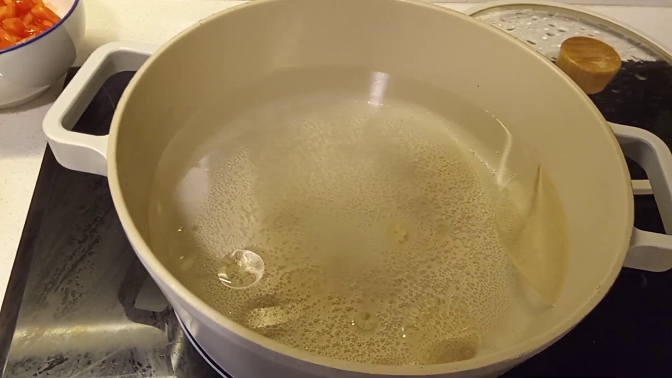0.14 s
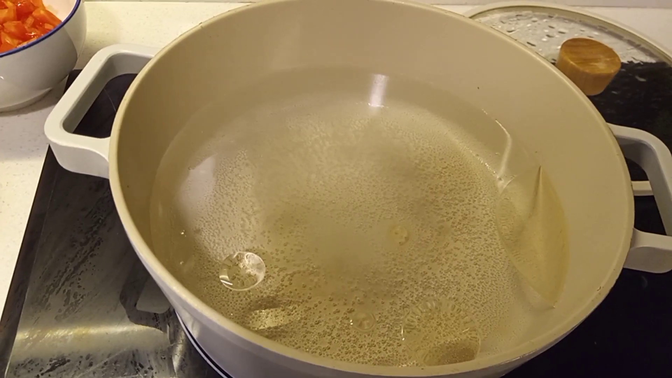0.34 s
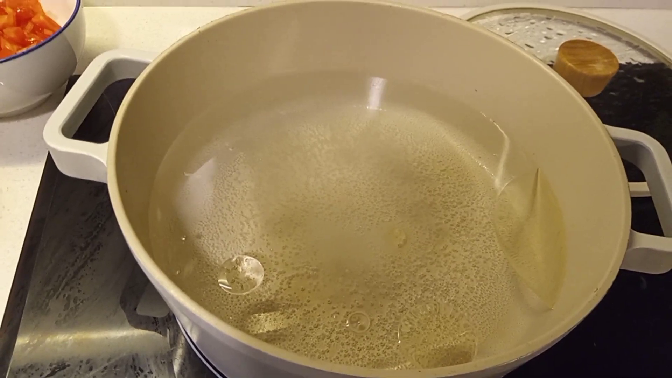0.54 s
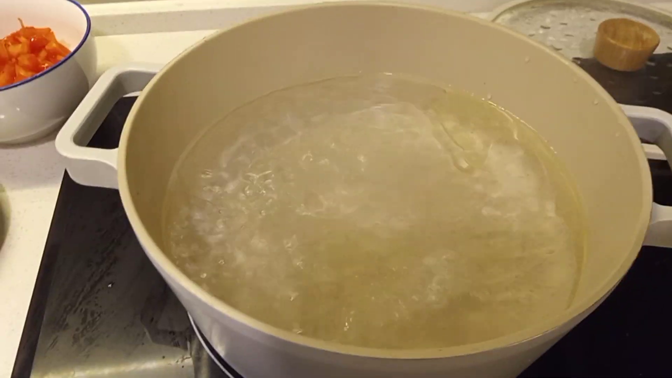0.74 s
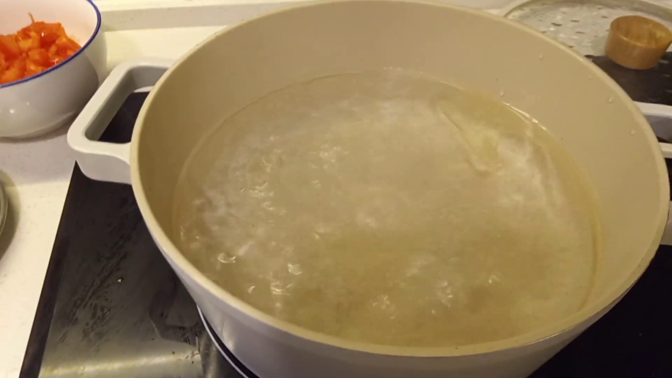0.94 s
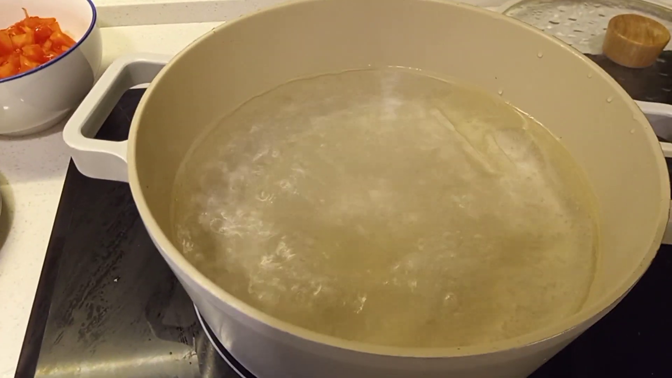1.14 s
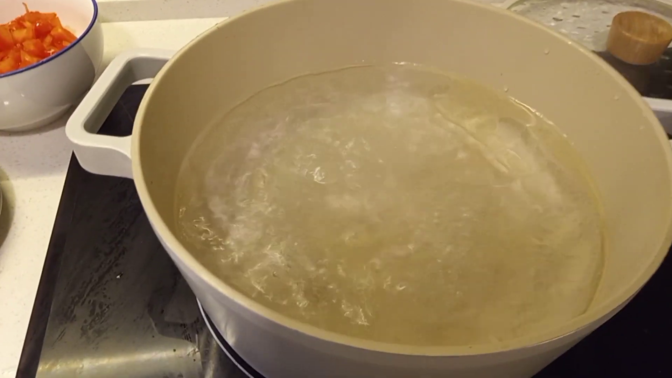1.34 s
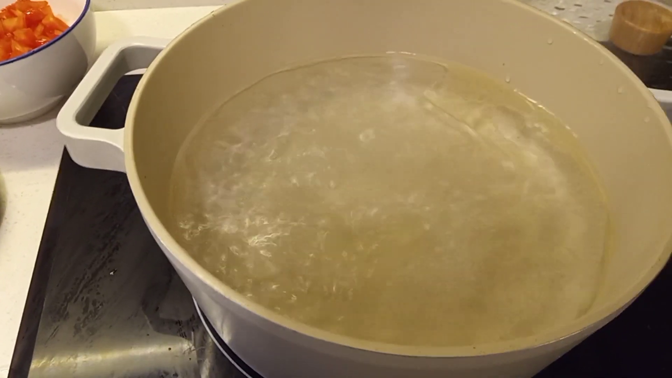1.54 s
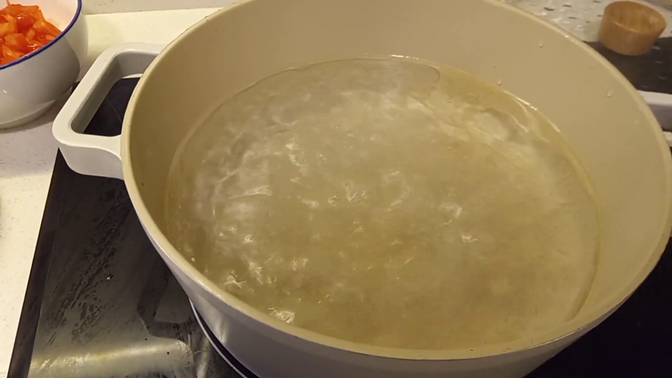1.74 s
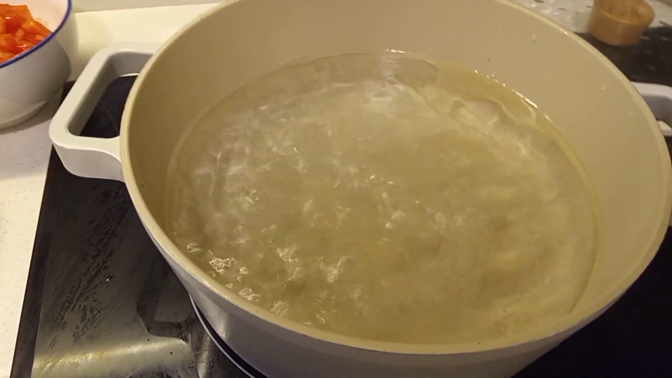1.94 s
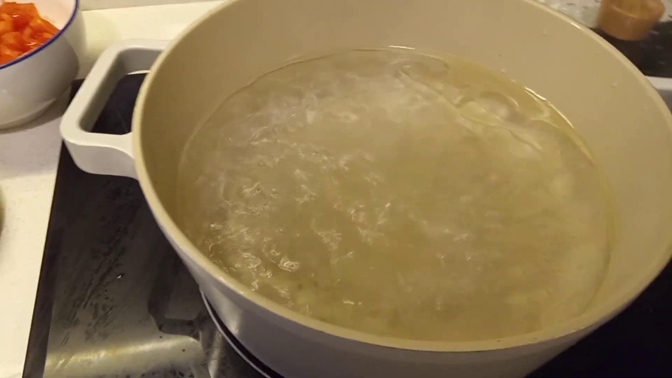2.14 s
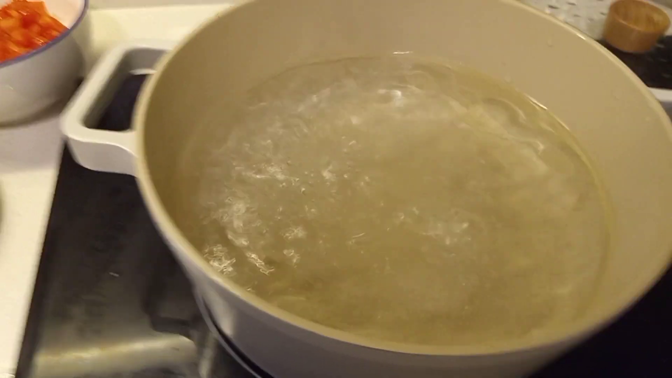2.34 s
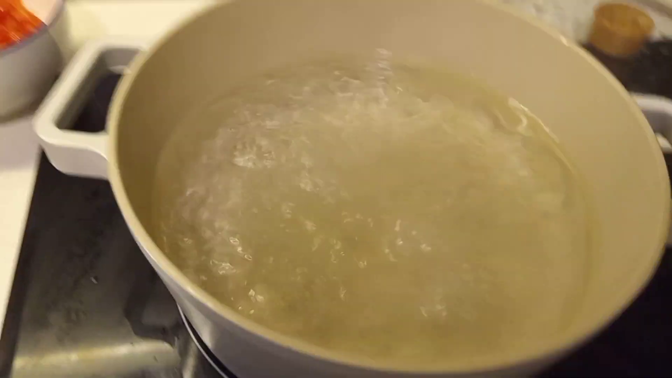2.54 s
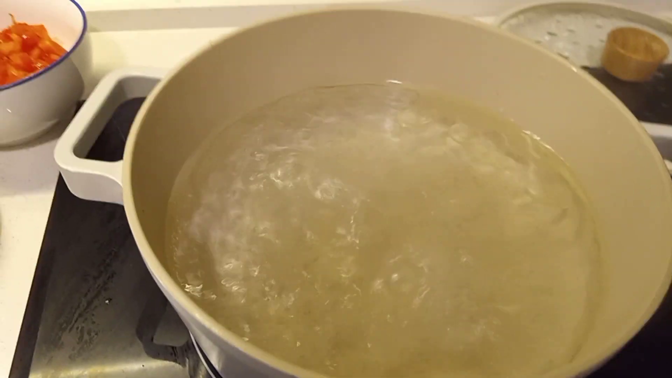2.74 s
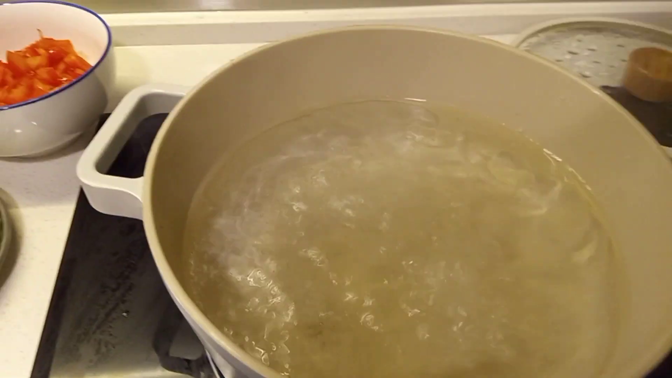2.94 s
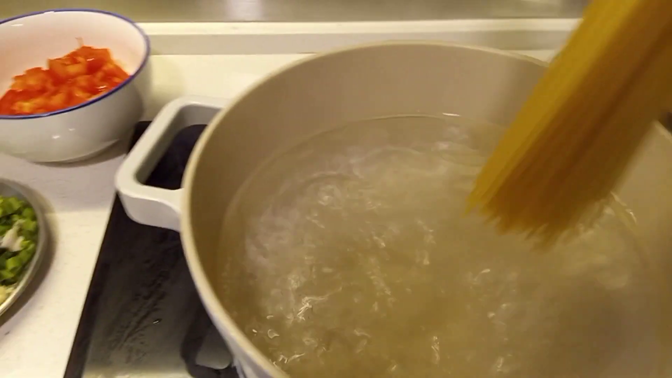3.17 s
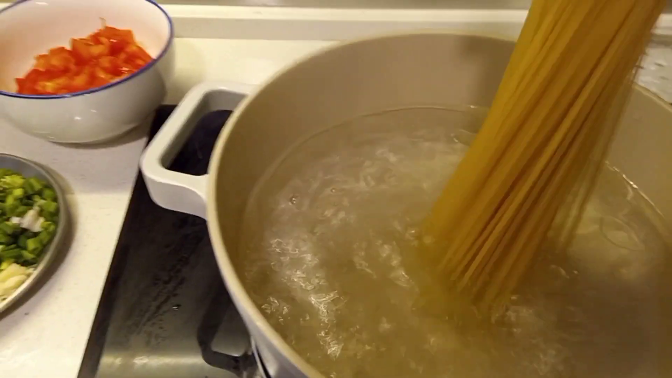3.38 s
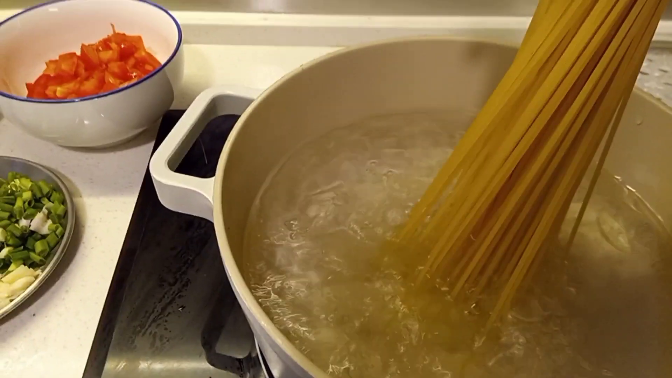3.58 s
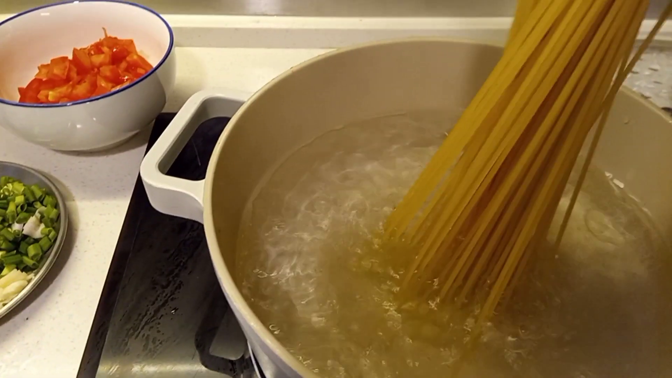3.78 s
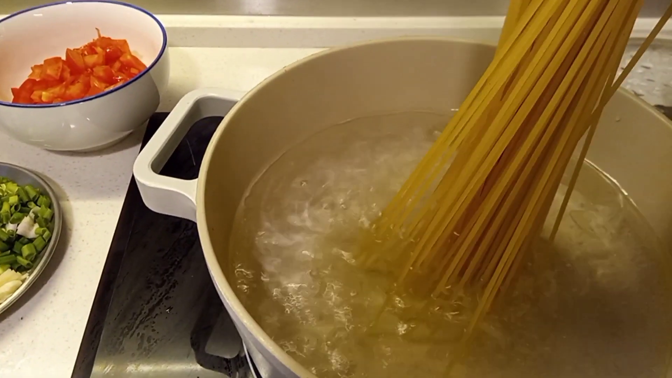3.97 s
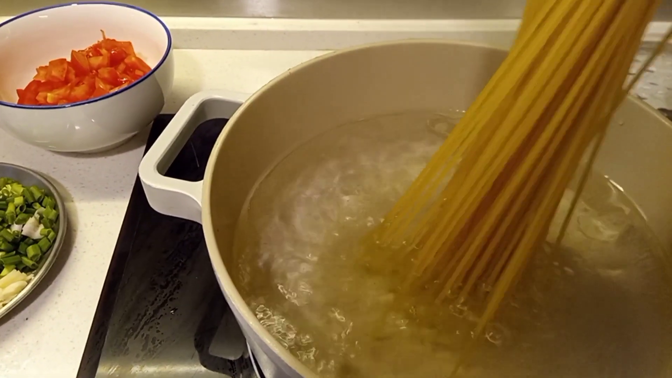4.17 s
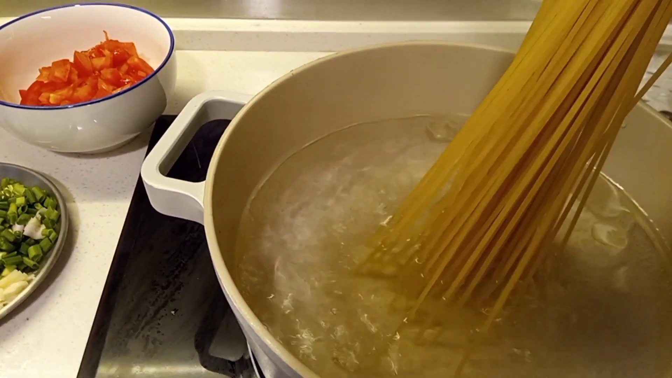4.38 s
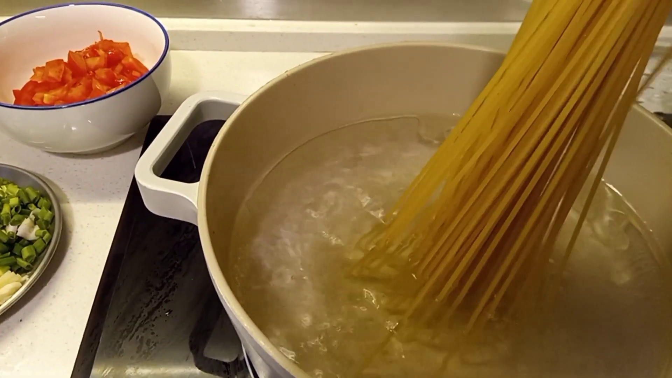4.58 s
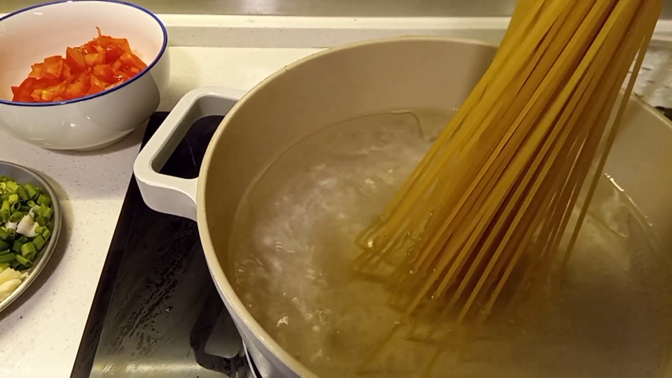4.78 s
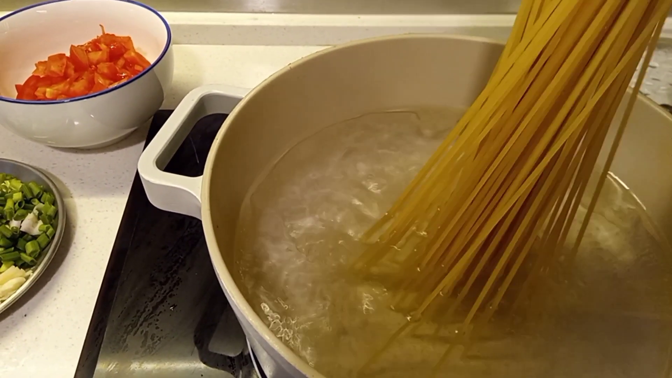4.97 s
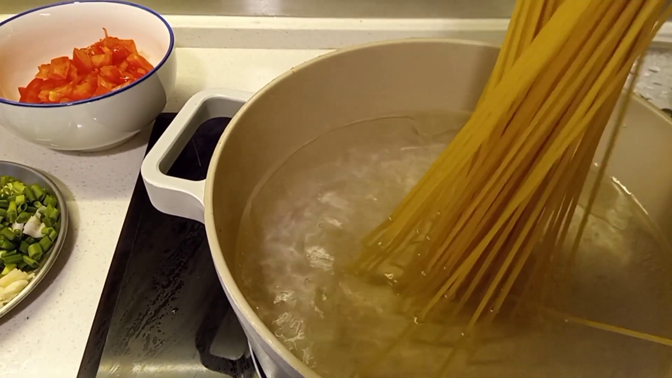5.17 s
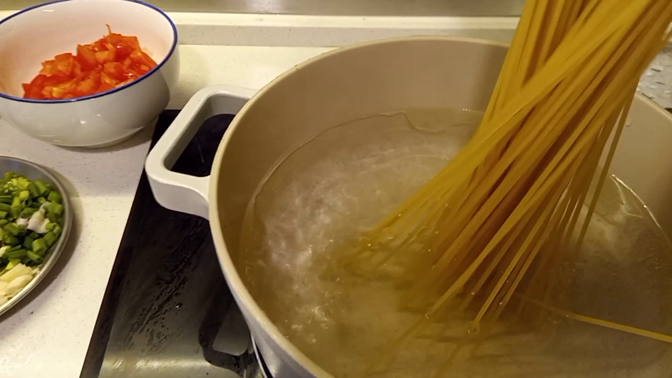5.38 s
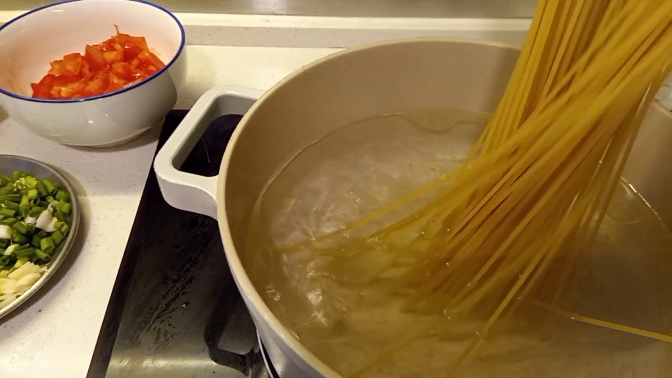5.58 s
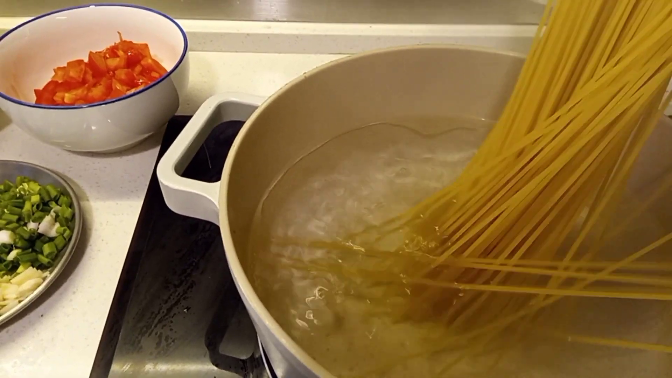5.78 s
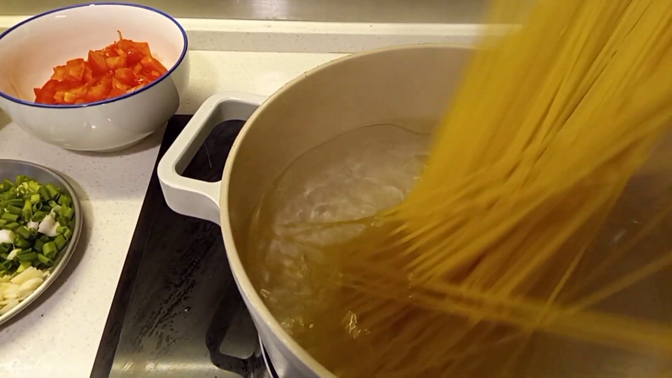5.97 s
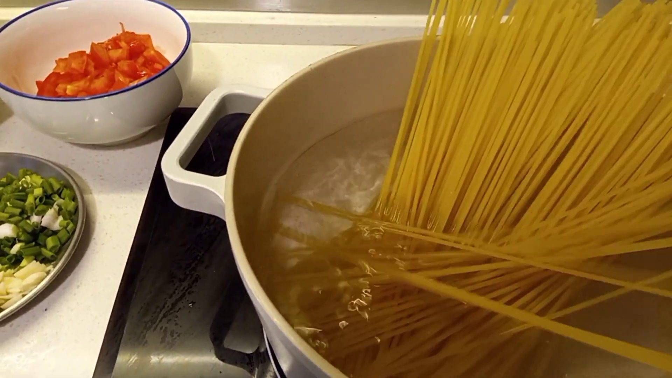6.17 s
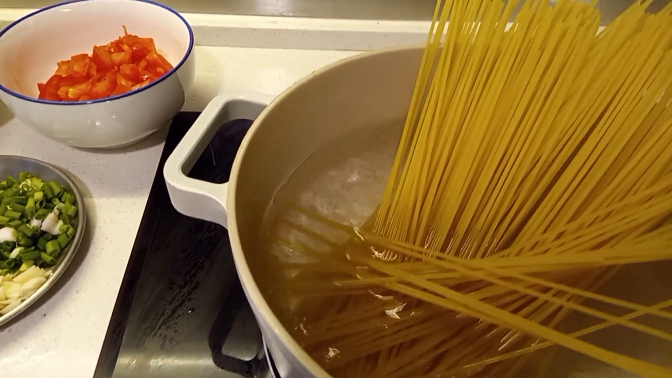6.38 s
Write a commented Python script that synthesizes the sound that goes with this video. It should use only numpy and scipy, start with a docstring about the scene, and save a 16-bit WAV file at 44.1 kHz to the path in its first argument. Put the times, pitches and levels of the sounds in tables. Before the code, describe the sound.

Low boiling burble with a brief early dropout, a rustle of dry pasta, a clattering landing in the pot, sparse brittle clicks and a final slide.

```python
"""A wide pot of water bubbles on a hob in a small kitchen; the sound drops out briefly near the start.
A bundle of dry spaghetti rustles as it is gathered up, then its tips land on the bottom of the pot.
Single strands click against each other and the rim, until the bundle is let go and fans out.
Spaghetti is bursts of filtered impacts, ringing modes and struck strands; the boil is filtered
impacts with water resonances and gliding bubble tones over a soft noise hiss."""
import sys
import numpy as np
from scipy import signal
from scipy.io import wavfile
from scipy.ndimage import uniform_filter1d

SR = 44100
rng = np.random.default_rng(int(sys.argv[2]) if len(sys.argv) > 2 else 0)


def persist_wave(psi):
    """Save psi, clipped to +-1, as 16-bit WAV."""
    counts = np.round(np.clip(psi, -1, 1) * 32767).astype(np.int16)
    wavfile.write(sys.argv[1], SR, np.atleast_2d(counts).T)


N = 282989
TIME = np.arange(N) / SR
EDGE_HZ = 15850  # upper band limit; almost nothing sounds above it

# waves of tips landing in the pot: start_s, rise_s, hold_s, relative ticks_db, relative body_db
TIP_LANDINGS = [(3.253, 0.035, 0.0076, -31.5, -34.5), (3.326, 0.03, 0.021, -40.5, -44.5),
                (3.435, 0.032, 0.029, -63, -67)]
# tone colour of the landing: frequency_hz, relative level_db
LANDING_SPECTRUM = [(130, -28), (210, -3), (320, -4.5), (410, -37), (490, -1.5), (600, -3), (680, -14),
                    (780, -4), (1150, 4), (2700, -7), (3900, -17), (5900, -3.5), (7400, -13.5),
                    (11000, -34), (14000, -38), (15500, -24)]
# modes of the held bundle: frequency_hz, relative level_db
BUNDLE_MODES = [(1416, -66), (1879, -69), (2584, -69.5), (2821, -74), (3144, -82), (3429, -79),
                (3774, -79.5), (4140, -72.5), (4953, -73), (5233, -77.5), (5943, -77), (6019, -75.5),
                (6137, -72), (6449, -79), (6675, -70), (6735, -80.5), (7596, -83.5), (8403, -95)]
# modes of the pot: frequency_hz, relative level_db
POT_MODES = [(595, -43), (918, -52.5), (1064, -52), (1260, -40), (1844, -43.5), (2035, -39), (2404, -40.5),
             (2632, -47.5), (2815, -48), (3531, -61), (4935, -53), (5115, -48), (5744, -44.5),
             (5848, -44.5), (6075, -42.5), (6971, -63)]


def amp(db):
    """Decibels to gain."""
    return 10 ** (np.asarray(db) / 20)


def unit(x):
    """Scales to an rms of one."""
    return x / np.sqrt(np.mean(x ** 2) + 1e-20)


def read(points, hz):
    """Reads a curve of (frequency_hz, value) on a log-frequency axis."""
    f, value = np.transpose(points)
    return np.interp(np.log(hz + 1), np.log(f), value)


def add(mix, s, sound):
    """Mixes a sound in at time s."""
    part = mix[max(round(s * SR), 0):][:len(sound)]
    part += sound[:len(part)]


def colour(x, spectrum, size=4096):
    """Causal minimum-phase filter with the given spectrum, so that attacks stay sharp."""
    hz = abs(np.fft.fftfreq(size, 1 / SR))
    log_gain = np.log(amp(np.maximum(read(spectrum, hz), -100)))
    # the Hilbert transform of the log gain supplies the phase
    response = np.fft.ifft(np.exp(np.conj(signal.hilbert(log_gain)))).real
    return signal.oaconvolve(x, response[:size // 2])[:len(x)]


def resonate(x, hz, width_hz):
    """One resonance, with a gain of one at its peak."""
    b, a = signal.iirpeak(min(hz, SR / 2 - 1), hz / abs(width_hz), SR)
    return signal.lfilter(b, a, x)


def patter(per_s, spread_db, size=N):
    """Random tiny impacts of either sign, most of them weak and a few strong."""
    strength_db = spread_db * np.minimum(rng.exponential(1, size), np.pi)
    force = amp(strength_db) * rng.choice([-1, 1], size)
    return force * (rng.random(size) < per_s / SR)


def surges(t, rows, fall_db_per_s):
    """Each push builds up, holds and dies away; rows are (start_s, rise_s, hold_s, level_db)."""
    power = np.zeros(len(t))
    for s, rise_s, hold_s, db in rows:
        attack = np.clip((t - s) / rise_s, 0, 1) ** 2
        release_db = fall_db_per_s * np.maximum(t - s - rise_s - hold_s, 0)
        power += (attack * amp(db - release_db)) ** 2
    return np.sqrt(power)


def spaghetti():
    """The whole bundle is gathered, stood in the pot and let go: three rattles of strand contacts."""
    # shoves that gather the bundle: start_s, rise_s, hold_s, relative ticks_db, relative body_db
    shoves = [(0.62, 0.046, 0.16, -50.5, -59.5), (0.86, 0.059, .005, -54.5, -61),
              (0.985, 0.028, 0.011, -45, -56.5), (1.02, 0.024, .012, -66, -62),
              (1.135, 0.026, 0.032, -53, -59), (1.31, 0.034, .003, -68.5, -77),
              (1.385, 0.06, 0.011, -59, -70), (1.53, 0.012, .002, -63, -79),
              (1.66, 0.057, 0.18, -73, -81.5), (1.94, 0.012, 0.0035, -67, -66),
              (1.98, 0.011, .003, -64, -91), (2.115, 0.023, .003, -68.5, -71)]
    # tone colour of the gathering: frequency_hz, relative level_db
    shove_spectrum = [(500, -51), (1000, -6), (1420, -20.5), (1650, -13.5), (1880, 2.5), (2300, -12.5),
                      (2700, -4), (4400, -9), (5500, -2), (6660, 2), (8700, -15), (11500, -19.5),
                      (13500, -28), (15300, -10.5)]
    # slides as it fans out along the rim: start_s, rise_s, hold_s, relative ticks_db, relative body_db
    slides = [(5.922, .017, 0.0033, -46, -74), (5.945, .02, 0.043, -54, -78),
              (6.0, 0.035, 0.0068, -46, -61.5), (6.14, 0.11, .012, -71, -92)]
    # tone colour of the slides: frequency_hz, relative level_db
    slide_spectrum = [(700, -47), (1200, -29), (2100, -10), (3200, -15), (4200, -3.5), (5500, -3),
                      (7000, 6), (8500, -15.5), (11000, -20), (13400, -21), (15000, -10)]
    out = np.zeros(N)
    add(out, *rattle(shoves, shove_spectrum, BUNDLE_MODES,
                     ticks_fall_db_per_s=282, body_fall_db_per_s=230, per_s=2500, spread_db=4.0,
                     direct_db=-4.5, twang_db=4.0, ring_db=-5.5, width_hz=21.5, knocks_per_s=130))
    add(out, *rattle(TIP_LANDINGS, LANDING_SPECTRUM, POT_MODES,
                     ticks_fall_db_per_s=516, body_fall_db_per_s=444, per_s=4000, spread_db=1.5,
                     direct_db=0.74, twang_db=-4, ring_db=-9, width_hz=20.5, knocks_per_s=460))
    add(out, *rattle(slides, slide_spectrum, POT_MODES,
                     ticks_fall_db_per_s=420, body_fall_db_per_s=410, per_s=1800, spread_db=3.0,
                     direct_db=-1, twang_db=16, ring_db=-10, width_hz=30, knocks_per_s=140))
    return out


def rattle(rows, spectrum, modes, ticks_fall_db_per_s, body_fall_db_per_s, per_s, spread_db, direct_db,
           twang_db, ring_db, width_hz, knocks_per_s, split_hz=3200):
    """Strand contacts as bright ticks over a hollow body; separate sparse knocks ring each mode."""
    s, rise_s, hold_s, ticks_db, body_db = np.transpose(rows)
    t = np.arange(s[0], s[-1] + .3, 1 / SR)
    bright = surges(t, zip(s, rise_s, hold_s, ticks_db), ticks_fall_db_per_s)
    hollow = surges(t, zip(s, rise_s, hold_s, body_db), body_fall_db_per_s)
    ticks = unit(patter(per_s, spread_db)[:len(t)])
    ringing_strands = amp(twang_db) * twangs(len(t), t60=0.081, spread_db=3)
    contacts = colour(ticks + ringing_strands, spectrum)
    high = signal.sosfilt(signal.butter(4, split_hz, "high", fs=SR, output="sos"), contacts)
    low = signal.sosfilt(signal.butter(4, split_hz, "low", fs=SR, output="sos"), contacts)
    sound = amp(direct_db) * (bright * unit(high) + hollow * unit(low))
    loudest_db = max(db for _, db in modes)
    for hz, db in modes:
        push = bright if hz > split_hz else hollow
        blows = unit(patter(knocks_per_s, spread_db, size=2 * SR))[:len(t)] * push
        # a narrow mode takes only its share of a blow's energy
        makeup = np.sqrt(SR / (np.pi * width_hz))
        sound += amp(db - loudest_db + ring_db) * makeup * resonate(blows, hz, width_hz)
    return s[0], sound


def twangs(size, t60, spread_db, count=5000):
    """Hits spread over two seconds, cut to size: each strand rings briefly at its own pitch."""
    out, age = np.zeros(size), np.arange(SR // 16) / SR
    decay = amp(-60 * age / t60)
    hits = rng.random((count, 3)) * [2, EDGE_HZ, 1]
    for s, hz, luck in hits[hits[:, 0] < size / SR]:
        strength = amp(-spread_db * np.log(max(luck, .1)))
        add(out, s, strength * decay * np.sin(2 * np.pi * hz * age))
    return unit(out)


def afterring(ring_db=-12):
    """Each wave of tips leaves the pot ringing."""
    out, t = np.zeros(N), np.arange(SR // 2) / SR
    for s, rise_s, hold_s, _, body_db in TIP_LANDINGS:
        fade_in = np.minimum(t / hold_s, 1)
        add(out, s + rise_s, amp(body_db + ring_db) * fade_in * pot_ring(t, LANDING_SPECTRUM))
    return out


def pot_ring(t, spectrum, t60_at_1khz=0.49, damping=0.74):
    """The modes of the pot dying away after a blow of the given colour, the high ones first."""
    hz, db = np.transpose(POT_MODES)
    phases = np.outer(hz, t) + rng.random((len(hz), 1))
    tones = amp(db + read(spectrum, hz))[:, None] * np.sin(2 * np.pi * phases)
    t60 = t60_at_1khz * (hz / 10 ** 3) ** -damping
    return (tones * amp(-60 * t / t60[:, None])).sum(0) / tones.sum(0).std()


def knocks(rise_s=0.0024, t60=0.1, reach_octaves=0.2):
    """Strands settling in the bundle ring those of its modes that lie near their own pitch."""
    # strands knocking as they settle: start_s, relative level_db, pitch_hz
    settling = [(0.825, -54, 1420), (1.154, -54.5, 3570), (1.171, -55, 4130), (1.409, -66, 1880),
                (1.429, -59, 6900), (1.545, -61, 6900), (1.548, -60.5, 4470), (1.95, -59.5, 4140),
                (1.952, -57, 1540), (1.99, -59.5, 3600)]
    out, t = np.zeros(N), np.arange(SR // 4) / SR
    hz, mode_db = np.transpose(BUNDLE_MODES)
    shape = (1 - np.exp(-t / rise_s)) * np.exp(-np.log(1000) * t / t60)
    for s, db, centre_hz in settling:
        weight = amp(mode_db) * np.exp(-(np.log2(hz / centre_hz) / reach_octaves) ** 2)
        tones = np.sin(2 * np.pi * (np.outer(hz, t) + rng.random((len(hz), 1))))
        add(out, s, amp(db) * shape / shape.max() * unit(weight @ tones))
    return out


def clicks(width_hz=200, crack_db=5, crack_s=0.0029, rise_s=0.00047, t60=0.094, partials_db=3,
           pot_db=-18, count=70):
    """One strand strikes: a treble snap, chatter, scattered partials, one clear ping; the pot rings on."""
    # strand strikes: start_s, relative level_db, pitch_hz, relative snap_db, ping_over_chatter_db
    strikes = [(0.7938, -49, 6800, -10, 2), (1.0085, -44.5, 6200, -15, 14), (1.179, -48, 5950, -29, 4),
               (1.826, -65.5, 6230, -5, 1), (2.7916, -66, 4270, -14, 1), (2.792, -76, 9270, -20, 13),
               (3.4681, -45, 6060, -32, 0), (3.492, -50.5, 5990, -37, -3), (3.688, -38, 5980, -20, -6),
               (3.691, -50, 2890, -33, 2), (3.733, -51.5, 4100, -25, 8), (3.7435, -60, 3620, -35, 6),
               (4.9578, -50, 6100, -10, 5), (4.9637, -68, 5900, -20, 13), (5.0357, -55, 6120, -16.5, 12),
               (5.107, -69.5, 7590, -23, 8), (5.138, -58.5, 3220, -30, 15), (5.5799, -60.5, 6600, -1.5, -1),
               (5.59, -62.5, 6140, -6, 4), (5.6408, -61.5, 5980, -5, 1), (5.695, -62.5, 3940, -8, 8),
               (5.7125, -66, 3950, -6, -1), (5.9312, -52, 7300, -29, 6), (5.9393, -45.5, 7170, -30, 13),
               (6.0, -51, 6060, -10, -1), (6.0323, -43.5, 7070, -8, -7), (6.0422, -52, 6730, -12, -4)]
    # colour of the chatter: frequency_hz, relative level_db
    chatter_spectrum = [(300, -30), (1500, -19.5), (2300, -19.5), (2900, -5), (3800, -3.5), (4300, -12),
                        (5300, 2.5), (6300, -1), (7400, -1), (8400, -33), (15500, -46)]
    # colour of the treble snap: frequency_hz, relative level_db
    snap_spectrum = [(4000, -9.5), (8000, 2), (10000, 4.5), (13000, -7), (15300, 4)]
    out, t = np.zeros(N), np.arange(SR // 5) / SR
    for s, db, hz, snap_db, ping_db in strikes:
        crack = 1 + amp(crack_db) * np.exp(-t / crack_s)
        shape = (1 - np.exp(-t / rise_s)) * np.exp(-np.log(1000) * t / t60) * crack
        shape /= np.sqrt(np.mean(shape[:SR // 250] ** 2))  # level over the first 4 ms
        chatter, snap, wander = rng.standard_normal((3, len(t)))
        phases = np.outer(rng.random(count) * EDGE_HZ, t) + rng.random((count, 1))
        partials = np.sin(2 * np.pi * phases).sum(0)
        body = unit(colour(chatter + amp(partials_db) * unit(partials), chatter_spectrum))
        # the ping's pitch wanders, which widens its line
        drift = width_hz / 2 * unit(uniform_filter1d(wander, SR // 500))
        ping = unit(np.sin(2 * np.pi * np.cumsum(hz + drift) / SR))
        bright_snap = amp(snap_db) * unit(colour(snap, snap_spectrum))
        click = unit(body + amp(ping_db) * ping) + bright_snap
        add(out, s, amp(db) * (shape * click + amp(pot_db) * pot_ring(t, chatter_spectrum)))
    return out


def thud(start_s=3.28, rise_s=0.024, hold_s=0.21, level_db=-61, fall_db_per_s=400, hz=68, width_hz=45):
    """The weight of the bundle makes the pot judder on the hob: a swell of low resonant noise."""
    judder = resonate(resonate(rng.standard_normal(N), hz, width_hz), hz, width_hz)
    return surges(TIME, [(start_s, rise_s, hold_s, level_db)], fall_db_per_s) * unit(judder)


def boil(rumble_db=-64.5, hiss_db=-76.5, ring_db=5):
    """Countless small collapses rumble in the water; larger bubbles stand out over a steady soft hiss."""
    # colour of the steady boil: frequency_hz, relative level_db
    boil_spectrum = [(15, -60.5), (25, -17), (87, -4.5), (106, -10), (134, -15), (231, -3), (359, -12),
                     (485, -12.5), (695, -23), (1320, -21), (1550, -26.5), (1890, -23.5), (3000, -35.5),
                     (3900, -63), (6600, -120)]
    # colour of the background hiss: frequency_hz, relative level_db
    hiss_spectrum = [(1000, -15.5), (2500, -2), (5000, -4.5), (7400, -3.5), (8400, -17.5), (11000, -25.5),
                     (14000, -23), (15600, -16)]
    # resonances of the pot of water that the boil keeps stirring: frequency_hz, width_hz, relative gain_db
    water_modes = [(95.2, 8.9, 3.5), (244.8, 31, -5), (402.7, 22, -2.5), (479, 16.2, -3), (864, 85, -3.5),
                   (1439, 36, -1), (1868, 50, -3)]
    # big steam pockets collapsing on the bottom: start_s, level_db
    collapses = [(0.439, -57), (0.959, -50.5), (0.999, -51), (1.19, -50), (1.367, -55), (1.473, -51.5),
                 (2.128, -55), (3.3, -57.5), (3.885, -57), (4.563, -56.5), (4.935, -59), (5.179, -55.5),
                 (5.259, -54.5)]
    # steam bubbles welling up: start_s, level_db
    wellings = [(0.084, -53.5), (1.494, -61.5), (2.773, -53.5), (3.004, -53.5), (3.28, -51), (4.294, -57),
                (4.445, -53), (4.562, -54.5), (5.05, -47.5), (5.595, -54.5), (6.325, -53)]
    # small bubbles bursting: start_s, level_db, pitch_hz
    bursts = [(2.045, -68, 618), (3.51, -61, 479), (3.55, -65.5, 1890), (3.578, -67, 1975),
              (4.07, -64, 1345), (5.525, -67, 836), (5.89, -59.5, 844)]
    churn = colour(patter(per_s=3700, spread_db=3.0), boil_spectrum)
    ringing = sum(amp(db + ring_db) * resonate(churn, hz, width) for hz, width, db in water_modes)
    rumble = amp(rumble_db) * unit(churn + ringing)
    hiss = amp(hiss_db) * unit(colour(rng.standard_normal(N), hiss_spectrum))
    thumps = bubbles(near_pitch(collapses, hz=90.7), swell_s=0.027, glide=-.01)
    glugs = bubbles(near_pitch(wellings, hz=236.6), swell_s=0.022, glide=0.013)
    plops = bubbles(bursts, swell_s=0.022, glide=0.011)
    fizz = bubbles(simmer(), swell_s=0.014, glide=0.0081)
    return rumble + hiss + thumps + glugs + plops + fizz


def bubbles(rows, swell_s, glide):
    """Each bubble swells and dies as a short tone whose pitch slides by the glide per swell time."""
    out, t = np.zeros(N), np.arange(SR // 4) / SR
    age = t / swell_s
    shape = (age * np.exp(1 - age)) ** np.e
    for s, db, hz in rows:
        turns = np.cumsum(hz * (1 + glide * (age - 1))) / SR + rng.random()
        add(out, s, amp(db) * shape * np.sin(2 * np.pi * turns))
    return out


def near_pitch(rows, hz, scatter=0.039):
    """Bubbles of one size all sound close to one pitch."""
    return [(s, db, hz * (1 + scatter * rng.standard_normal())) for s, db in rows]


def simmer(level_db=-83.0, spread_db=3.5, low_hz=330, high_hz=2600, tilt_db=-3.0, count=260):
    """Little bubbles at random times, fainter by the tilt with each octave up."""
    when, size, luck = rng.random((count, 3)).T
    hz = low_hz * (high_hz / low_hz) ** size
    db = level_db + tilt_db * np.log2(hz / high_hz) - spread_db * np.log(np.maximum(luck, .1))
    return np.column_stack([when * N / SR, db, hz])


def kitchen(x, delay_s=0.0014):
    """A dense tail from tiles and worktop: decaying noise whose mids linger longest."""
    # decay of the room: frequency_hz, t60_s
    room_decay = [(200, 0.04), (1500, 0.29), (5000, 0.2), (9000, 0.059), (15000, 0.099)]
    hz, t, z = signal.stft(rng.standard_normal(SR // 2), SR, nperseg=256)
    decay = np.exp(-np.log(1000) * t / read(room_decay, hz)[:, None])
    tail = signal.istft(z * decay, SR)[1]
    tail *= 1 - np.exp(-np.arange(len(tail)) / (SR * delay_s))  # soft onset
    return signal.fftconvolve(x, tail / np.linalg.norm(tail))[:N]


def scene(room_db=-12):
    """Pasta with its room tail, over the pot's judder and the boiling water."""
    pasta = spaghetti() + afterring() + knocks() + clicks()
    return (pasta + amp(room_db) * kitchen(pasta) + thud() + boil())[None]


def record(dry):
    """The level drops out for a moment, jumps partway back and climbs; then the band limit."""
    mute_start_s, mute_end_s, mute_db = .545, .613, -36
    return_from_db, return_s = -17, 0.092
    return_db = return_from_db * np.exp(-np.maximum(TIME - mute_end_s, 0) / return_s)
    gain_db = np.select([TIME < mute_start_s, TIME < mute_end_s], [0, mute_db], return_db)
    heard = dry * amp(uniform_filter1d(gain_db, size=300))  # smoothed edges
    lowpass = signal.firwin(511, EDGE_HZ, window=("kaiser", 9), fs=SR)
    return signal.oaconvolve(heard, lowpass[None], "same")


dry = scene()
out = record(dry)
persist_wave(out)
```